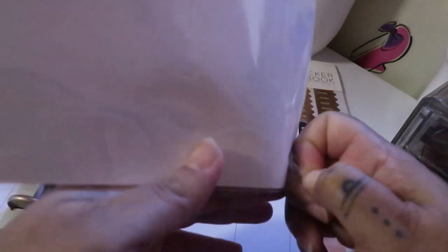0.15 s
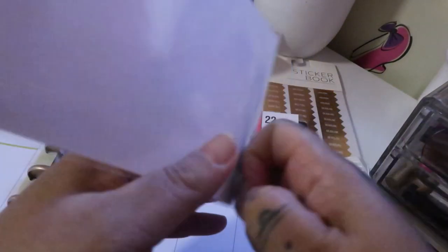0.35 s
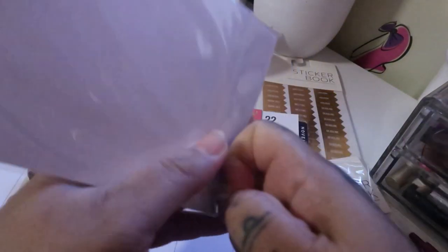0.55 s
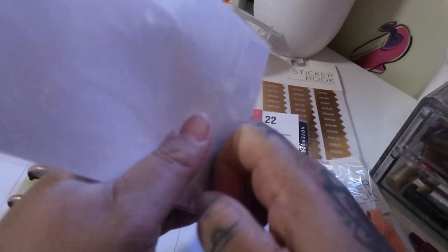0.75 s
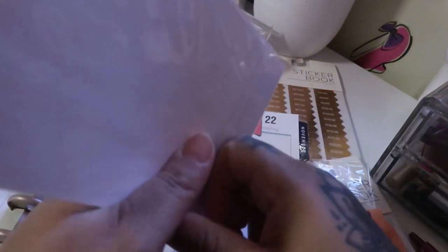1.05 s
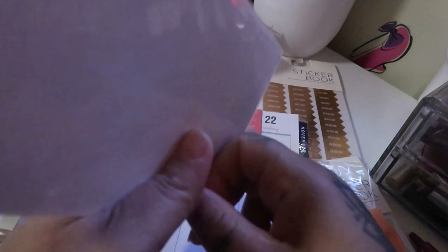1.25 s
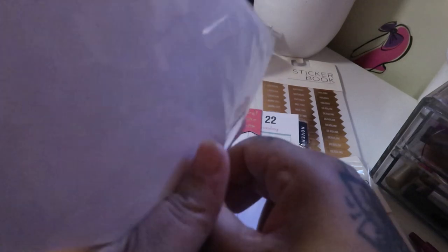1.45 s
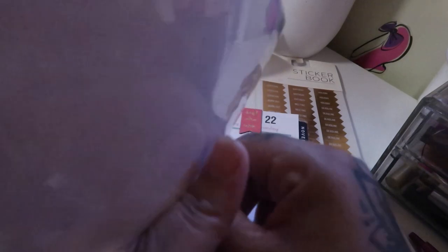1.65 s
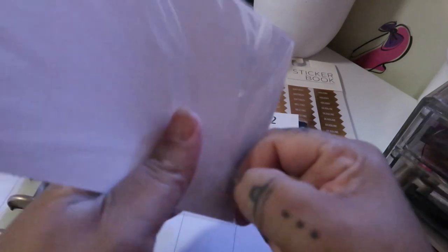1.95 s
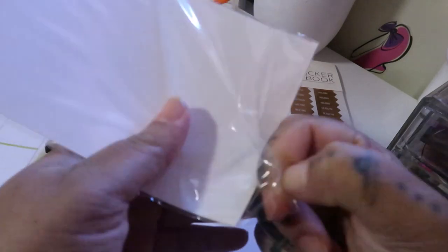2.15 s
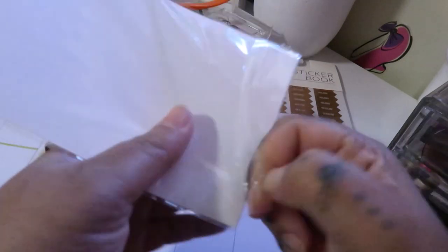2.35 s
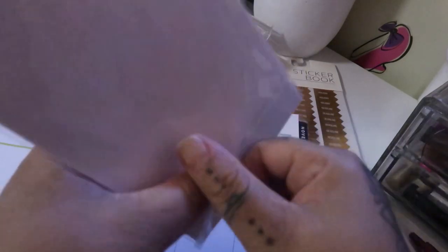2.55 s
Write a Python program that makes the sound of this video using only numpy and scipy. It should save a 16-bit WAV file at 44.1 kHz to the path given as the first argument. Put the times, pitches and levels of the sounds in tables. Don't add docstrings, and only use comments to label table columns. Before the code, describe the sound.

Thin plastic and paper crackle under fingers, quiet in the middle, then a loud burst of crinkling

```python
import sys
import numpy as np
from scipy import signal
from scipy.io import wavfile

SR = 44100
rng = np.random.default_rng(int(sys.argv[2]) if len(sys.argv) > 2 else 0)


def undo_db(level):
    steps = np.asarray(level, float) / 20
    return 10 ** steps


def log_audio(samples):
    frames = np.atleast_2d(samples).T
    limited = np.clip(frames, -1, 1)
    pcm = np.round(limited * 32767).astype(np.int16)
    wavfile.write(sys.argv[1], SR, pcm)


N = 119070
LEAD = 400

# hz, density_db
ROOM_SPECTRUM = [(28, 2.5), (52, -4), (150, 1.5), (400, -16.5), (1150, -23), (6500, -36.5), (13000, -58),
                 (16000, -60)]
# hz, opposed_part_db
ROOM_WIDTH = [(110, -27), (200, -14), (380, -2), (9000, 3.5)]
# hz, density_db
RUSTLE_SPECTRUM = [(170, -3), (330, 12), (550, -2.5), (900, 5.5), (1500, 0), (2800, 0.5), (10000, -10.5),
                   (14000, -15.5), (16000, -39)]
# hz, opposed_part_db
HANDS_WIDTH = [(300, -23.5), (2500, -26.5), (5500, -3.5), (9000, 0), (14000, 4)]
# time_s, level_db
HAND_EFFORT = [(0, -51.5), (0.266, -42.5), (0.307, -56.5), (.45, -40.5), (.75, -43), (.87, -46), (.93, -59),
               (1.4, -61.5), (1.88, -57), (1.959, -42), (2.1, -41.5), (2.2, -34), (2.29, -34.5),
               (2.34, -46), (2.4, -33.5), (2.5, -44), (2.58, -50.5), (2.7, -48)]
# start_s, level_db, pitch_hz
FINGER_PUSHES = [(0.1005, -49, 384), (0.3597, -32.5, 245), (0.528, -41, 340), (0.621, -40, 1080),
                 (0.627, -35.5, 388), (0.708, -38, 1020), (0.8468, -27, 1110), (0.85, -20, 322),
                 (0.864, -32, 1240), (0.896, -34, 775), (0.957, -45, 1140), (1.95, -36, 880),
                 (2.0185, -23.5, 1850), (2.157, -34, 1000), (2.218, -32, 850), (2.238, -24, 895),
                 (2.396, -32, 910), (2.471, -32, 1120), (2.654, -37, 271)]
# start_s, level_db, pitch_hz
PAPER_BUCKLES = [(2.426, -32, 920), (0.2598, -31, 1080), (0.3601, -40, 1000), (0.4286, -35.5, 1160),
                 (0.4809, -32, 535), (0.5549, -34, 1100), (0.6401, -32, 700), (0.648, -31, 570),
                 (0.732, -33, 360), (0.7407, -33.5, 900), (0.8274, -22.5, 380), (0.8465, -18.5, 333),
                 (0.848, -27.5, 117), (0.949, -42.5, 850), (1.288, -42, 390), (1.473, -36, 108.3),
                 (2.0179, -31, 1340), (2.1532, -25, 1090), (2.1715, -31, 1010), (2.192, -35, 1070),
                 (2.202, -26.5, 447), (2.2286, -21.5, 920), (2.2502, -26, 660), (2.2603, -30, 810),
                 (2.2837, -28, 440), (2.291, -29.5, 790), (2.3719, -25.5, 930), (2.4156, -28.5, 855),
                 (2.4718, -34, 260), (2.4999, -33.5, 1060)]
# start_s, level_db
FILM_TICKS = [(0.1006, -14), (0.1869, -36), (0.2308, -35), (0.4188, -29), (0.4797, -43), (0.5281, -33),
              (0.5416, -28), (0.6109, -31), (0.6418, -33), (0.7371, -46), (0.8015, -54), (0.826, -35),
              (0.834, -36), (0.853, -31), (1.472, -32), (1.5657, -40), (1.6341, -38), (1.7708, -39),
              (1.7932, -21.5), (1.929, -22), (1.9502, -36), (2.0162, -31), (2.152, -35), (2.1788, -28),
              (2.2153, -19), (2.2274, -22), (2.2373, -22), (2.2821, -19), (2.358, -37), (2.371, -26),
              (2.3939, -12), (2.4157, -30), (2.5116, -37), (2.5889, -38), (2.6588, -41)]
# start_s, ring_db, ring_hz, tick_db
FURTHER_SNAPS = [(0.154, -30, 2840, -50), (0.2314, -51, 5000, -38), (0.272, -59, 6000, -46),
                 (0.3601, -34, 1840, -55), (0.67, -43, 5600, -47), (0.885, -39, 2000, -55),
                 (1.288, -61, 4500, -63), (1.552, -39, 4660, -51), (1.607, -46, 3500, -58),
                 (1.6347, -44, 5000, -45), (1.7735, -42, 4520, -40), (1.827, -44, 2520, -56),
                 (1.837, -39, 3220, -52), (1.957, -28, 3500, -34), (2.003, -25.5, 3330, -21),
                 (2.014, -20, 5000, -30), (2.035, -28, 1590, -50), (2.188, -34, 2700, -38),
                 (2.265, -22, 2870, -40), (2.2836, -15, 2470, -37), (2.301, -25, 2860, -42),
                 (2.324, -28, 2970, -50), (2.352, -30, 3500, -52)]
# start_s, ring_db, ring_hz, tick_db
GRIP_SNAPS = [(0.0364, -35.5, 4730, -50), (0.1024, -17.5, 3510, -24), (0.1333, -29, 5500, -44),
              (0.1885, -28.5, 2970, -30), (0.2589, -28, 2690, -33), (0.3834, -34, 4270, -30),
              (0.4202, -19.5, 4480, -27), (0.4805, -19, 2630, -43), (0.4834, -15.5, 4500, -48),
              (0.4921, -46, 2390.0, -36), (0.5088, -27, 5940.0, -43), (0.5298, -28, 2340, -24.5),
              (0.5434, -27.5, 2350, -24.5), (0.5551, -25, 2400, -28), (0.6128, -32, 6130.0, -31),
              (0.6207, -26, 6100, -25), (0.6434, -32, 4360.0, -26), (0.6476, -32.5, 1910, -44),
              (0.7249, -28, 6030, -49), (0.7325, -21.5, 2740, -47), (0.7387, -21, 2580, -17.5),
              (0.7564, -38, 2980.0, -47)]
# start_s, ring_db, ring_hz, tick_db
PICK_SNAPS = [(0.803, -35.5, 2490, -57), (0.8259, -22, 3750, -26), (0.8346, -18.5, 3500, -15.5),
              (0.8508, -38, 1870, -42), (0.8542, -24.5, 2350, -26), (0.8629, -28, 2160, -31),
              (0.897, -43, 2180, -61), (1.1008, -35, 2380, -64), (1.3027, -42.5, 3170, -71),
              (1.4003, -38, 4530, -60), (1.4732, -22.5, 4020, -36), (1.568, -49, 4930, -43),
              (1.638, -26, 3270, -31), (1.7943, -25.5, 3960, -27.5), (1.8985, -33.5, 3700, -42),
              (1.9298, -22, 4000, -16), (1.944, -26, 2040, -42), (1.9508, -22.5, 3970.0, -20.5),
              (1.978, -25, 2060, -35), (1.9924, -24.5, 3700, -26), (2.0188, -12, 4400, -10.5),
              (2.0253, -23.5, 3860, -43), (2.0577, -27, 1930, -27)]
# start_s, ring_db, ring_hz, tick_db
TEAR_SNAPS = [(2.1477, -26, 3620.0, -28), (2.1526, -15.5, 3800, -42), (2.1702, -19, 3800, -32),
              (2.18, -7, 3360, -10.5), (2.2039, -19.5, 5920.0, -41), (2.2164, -13, 2920, -8.5),
              (2.228, -2, 2780, -16), (2.2376, -9, 4700, -28), (2.2496, -10.5, 5600, -25),
              (2.2584, -30, 2750.0, -35), (2.2832, -7.5, 5430, -14), (2.291, -13, 3550, -36),
              (2.3593, -23, 4500, -30), (2.371, -13, 3020, -13), (2.3799, -17, 2580, -34),
              (2.3887, -15.5, 4580.0, -28), (2.3958, -11.5, 2960, -15), (2.401, -16, 5040, -37),
              (2.4162, -15, 2850, -33), (2.4246, -18.5, 4970, -23), (2.4344, -20.5, 3140, -29),
              (2.439, -20, 5400, -34), (2.4564, -35, 4500, -26), (2.473, -23, 2840, -25),
              (2.5371, -29.5, 6300, -44), (2.6607, -32, 5190.0, -45)]

SNAP_S = 0.00027


def rms_one(x):
    return x / np.sqrt(np.mean(x ** 2) + 1e-20)


def at_hz(points, hz):
    table_hz, table_db = np.transpose(points)
    return np.interp(np.log(hz), np.log(table_hz), table_db)


def drift(rate_hz):
    r = np.exp(-80 * np.pi * rate_hz / SR)
    white = rng.standard_normal(N // 40 + 2002)
    slow = rms_one(signal.lfilter([1], [1, -2 * r, r * r], white)[2000:])
    return np.interp(np.arange(N) / 40, np.arange(len(slow)), slow)


def ring(x, hz, cycles):
    r = undo_db(-60 * hz / (cycles * SR))
    w = 2 * np.pi * hz / SR
    return signal.lfilter([.5, 0, -.5], [1, -2 * r * np.cos(w), r * r], x + 1e-18)


def widen(mid, side, hz, width=HANDS_WIDTH):
    return mid + undo_db(at_hz(width, hz)) * side * np.array([[1], [-1]])


def struck(draw, hz, cycles, push_s):
    t = np.maximum(np.arange(draw.shape[1]) - LEAD, 0) / SR / push_s
    both = ring(draw * t * np.exp(-t), hz, cycles)
    mid, side = both / np.abs(both).max(axis=1, keepdims=True)
    return widen(mid, side, hz)


def banded_noise(spectrum, patchy_db, rate_hz, width):
    out = 0
    together = drift(rate_hz)
    edges_hz = 25 * 2 ** np.arange(0, 9.6, .5)
    white = rng.standard_normal((2, 2, N))
    for k, (low, high) in enumerate(zip(edges_hz, edges_hz[1:])):
        band = signal.butter(2, [low, high], "band", fs=SR, output="sos")
        mid, side = signal.sosfilt(band, white[k % 2])
        hz = np.sqrt(low * high)
        level_db = at_hz(spectrum, hz) + patchy_db * (together + 0.12 * drift(rate_hz))
        out = out + undo_db(level_db) * widen(mid, side, hz, width)
    return rms_one(out)


def room_tone():
    hum = banded_noise(ROOM_SPECTRUM, patchy_db=-2.5, rate_hz=5.2, width=ROOM_WIDTH)
    boom = rms_one(ring(rng.standard_normal(N), hz=140.8, cycles=19.0))
    return undo_db(-45) * (hum + undo_db(-6.0) * boom)


def crackle():
    grains_per_s, spread_db = 990, 2.5
    sizes = undo_db(spread_db * np.minimum(rng.exponential(1, (2, N)), 4)) * rng.choice([-1, 1], (2, N))
    born = rng.random(N) < grains_per_s * undo_db(5 * drift(25)) / SR
    dealt = rng.integers(0, 16, N)
    out = 0
    for k, hz in enumerate(np.geomspace(500, 14000, 16)):
        hit = sizes * born * (np.abs(dealt - k) % 5 == 0)
        mid, side = ring(hit, hz, cycles=6.7)
        out = out + undo_db(at_hz(RUSTLE_SPECTRUM, hz)) * hz * widen(mid, side, hz)
    return rms_one(out)


def rustle():
    effort = undo_db(np.interp(np.arange(N) / SR, *np.transpose(HAND_EFFORT)))
    friction = banded_noise(RUSTLE_SPECTRUM, patchy_db=5.0, rate_hz=47.0, width=HANDS_WIDTH)
    return effort * (undo_db(-5.5) * friction + undo_db(-4.5) * crackle())


def knocks(rows, cycles):
    size = 4000
    out = np.zeros((2, N + size))
    n = np.arange(size)
    for start_s, level_db, hz in rows:
        draw = rng.standard_normal((2, size))
        i = int(start_s * SR) - LEAD
        pull = draw - [[2], [0]]
        partner_hz = min(2.57 * hz, 1150)
        knock = struck(pull, hz, cycles, 0.12 / hz)
        knock += struck(pull, partner_hz, 6.6, 0.08 / partner_hz)
        mid, side = ring(draw[::-1] * (n > LEAD) * undo_db(-n / 45), 860, 1.9)
        out[:, i:i + size] += undo_db(level_db) * knock + undo_db(level_db - 7.5) * widen(mid, side, hz)
    return out[:, :N]


def film():
    size, tick_hz, delay_s = 4000, 12800, 0.0015
    tail_db, tail_t60_s = -12.5, 0.11
    out = np.zeros((2, N + size))
    t = (np.arange(size) - LEAD) / SR
    tail = (t > 0) * undo_db(tail_db - 60 * t / tail_t60_s)
    top = signal.butter(2, [10500, 16000], "band", fs=SR, output="sos")
    for start_s, level_db in FILM_TICKS:
        draw = rng.standard_normal((2, 2, size))
        i = int((start_s + delay_s) * SR) - LEAD
        mid, side = signal.sosfilt(top, draw[1] * tail)
        tick = struck(draw[0], tick_hz, 7.9, SNAP_S)
        out[:, i:i + size] += undo_db(level_db) * (tick + widen(mid, side, tick_hz))
    return out[:, :N]


def snaps(rows):
    size = 9000
    crack_db, partner_db = -7.5, -15
    tail_db, tail_t60_s, long_db, long_t60_s = -13, 0.028, -17, 0.13
    creak_db, creak_s = -21.5, 0.013
    out = np.zeros((2, N + size))
    t = (np.arange(size) - LEAD) / SR
    colour = signal.butter(1, [1900, 6000], "band", fs=SR, output="sos")
    top = signal.butter(2, [6500, 12300], "band", fs=SR, output="sos")
    creak = undo_db(creak_db) * np.exp(np.minimum(t, 0) / creak_s)
    for start_s, ring_db, hz, tick_db in rows:
        draw = rng.standard_normal((6, 2, size))
        pick = rng.random(4)
        i = int(start_s * SR) - LEAD
        cycles = max(37 + 1.15 * ring_db, 4) * 2800 / hz
        body = struck(draw[0], hz, cycles, SNAP_S)
        body += undo_db(crack_db) * struck(draw[1, ::-1], 2650, 4.1, SNAP_S / 2)
        body += undo_db(partner_db) * struck(draw[1], 2200 + 4000 * pick[0], 29.0, SNAP_S)
        one = undo_db(ring_db) * body
        for k, top_hz in enumerate((7800, 10300)):
            tick_hz = top_hz * (0.86 + .16 * pick[k + 1])
            one += undo_db(tick_db - 4) * struck(draw[2 + k], tick_hz, 12, SNAP_S)
        lumps = undo_db(2.2 * np.repeat(draw[0, 0, -size // 60:], 60))
        after = lumps * undo_db(tail_db - 60 * t / tail_t60_s) + undo_db(long_db - 60 * t / long_t60_s)
        shed = draw[5] * np.where(t > 0, after, creak)
        one += undo_db(ring_db) * widen(*signal.sosfilt(colour, shed), 2700)
        one += undo_db(tick_db - 10.5) * widen(*signal.sosfilt(top, shed), 11600)
        out[:, i:i + size] += one
    return out[:, :N]


def scene():
    paper = knocks(FINGER_PUSHES, cycles=8.1) + knocks(PAPER_BUCKLES, cycles=10.4)
    creases = snaps(FURTHER_SNAPS) + snaps(GRIP_SNAPS + PICK_SNAPS + TEAR_SNAPS)
    return room_tone() + rustle() + paper + film() + creases


def top_cut(x):
    return signal.sosfilt(signal.butter(12, 16630, fs=SR, output="sos"), x)


def record(dry):
    low_pass = signal.cheby2(8, 50, 16700, fs=SR, output="sos")
    high_pass = signal.butter(2, 40, "high", fs=SR, output="sos")
    rounded = 2 * np.tanh(dry / 2)
    mix = signal.sosfilt(np.vstack([low_pass, high_pass]), rounded)
    return top_cut(mix)


dry = scene()
out = record(dry)
log_audio(out)
```